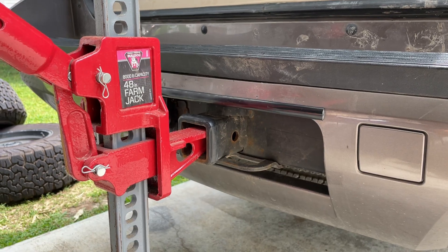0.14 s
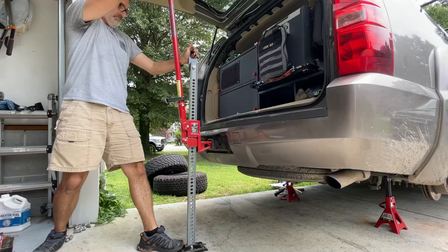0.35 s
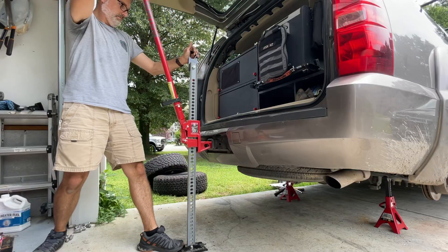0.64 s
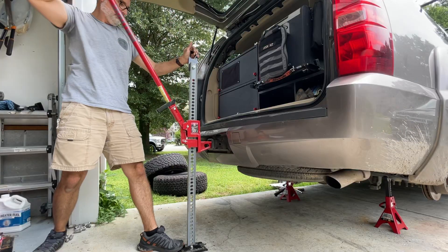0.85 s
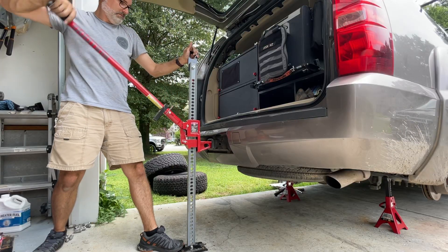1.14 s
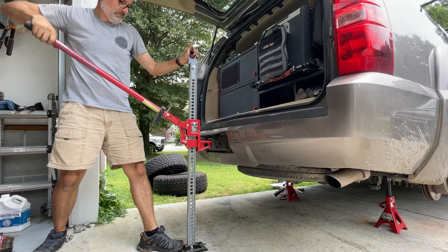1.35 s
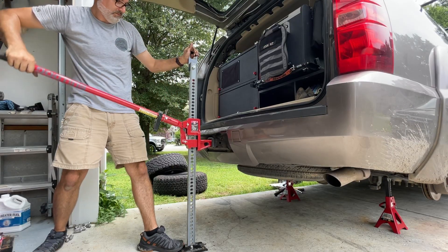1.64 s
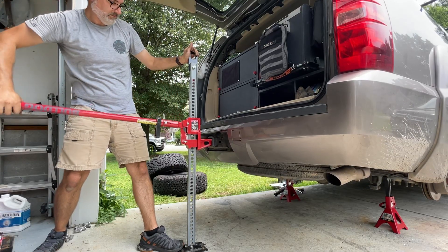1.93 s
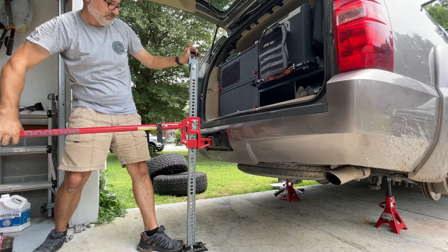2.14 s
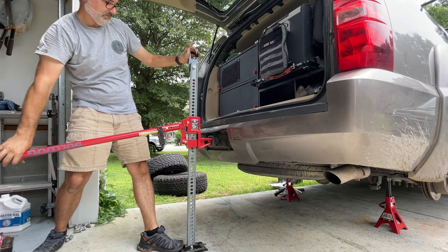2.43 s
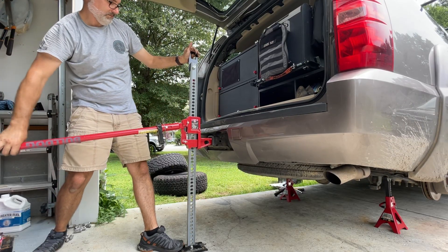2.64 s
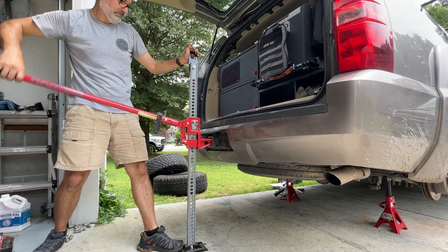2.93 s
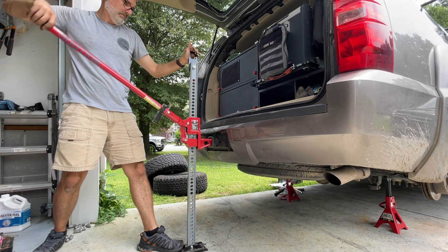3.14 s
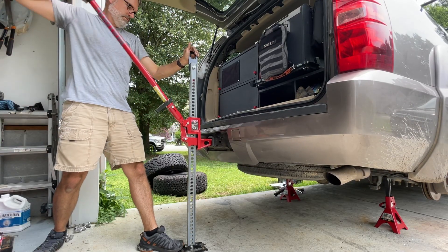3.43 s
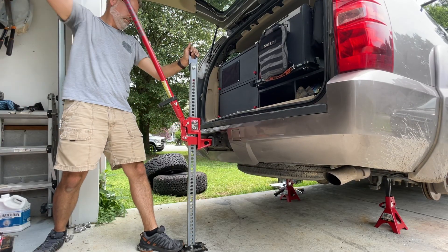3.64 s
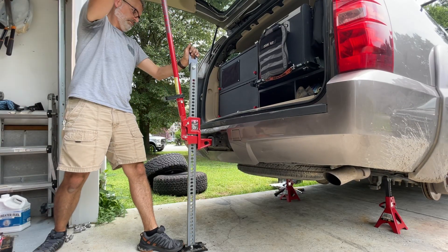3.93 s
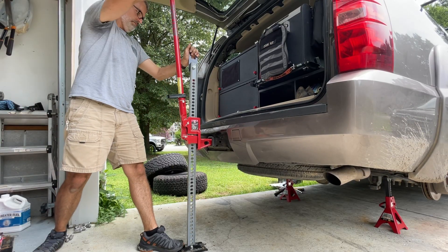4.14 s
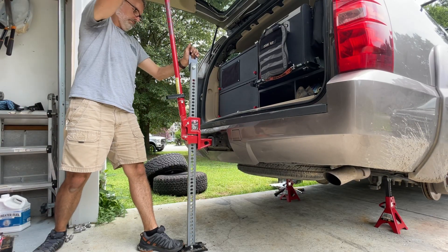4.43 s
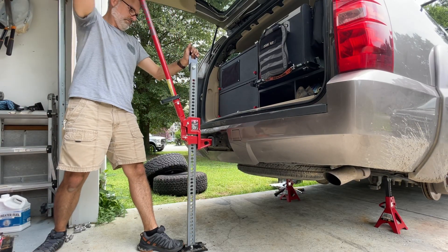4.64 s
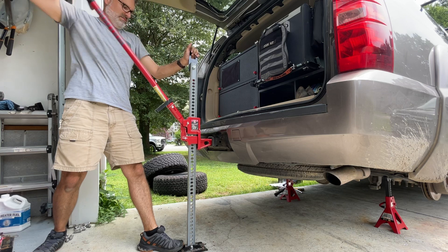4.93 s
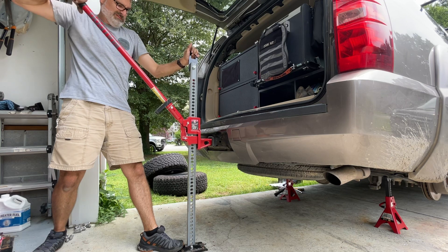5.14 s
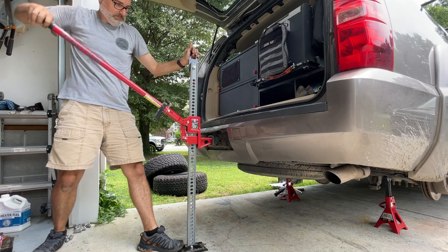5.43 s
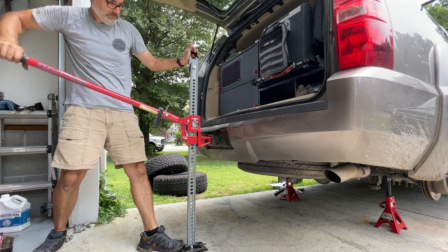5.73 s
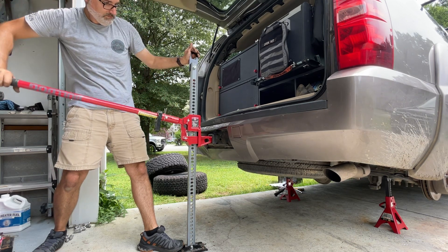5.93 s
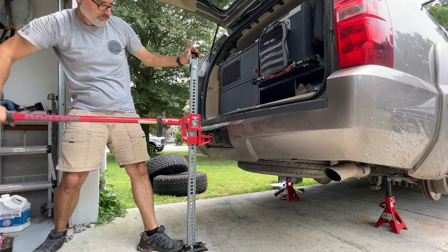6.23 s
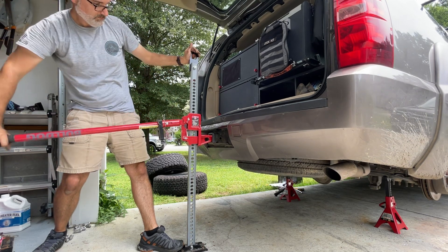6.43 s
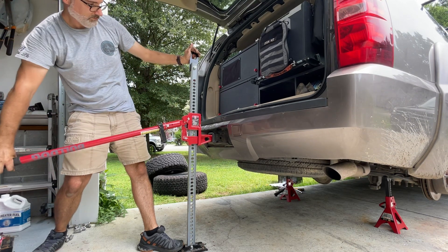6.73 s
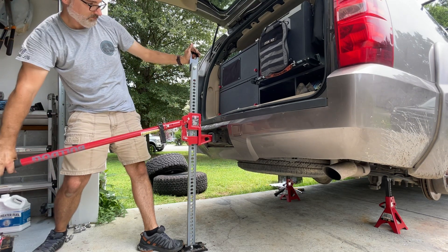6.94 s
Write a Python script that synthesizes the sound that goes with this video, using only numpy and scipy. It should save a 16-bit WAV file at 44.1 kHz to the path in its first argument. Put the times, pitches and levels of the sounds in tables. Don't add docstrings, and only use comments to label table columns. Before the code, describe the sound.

In the mouth of a garage, a metal lifting jack works through two strokes. Quiet dull knocks lead to a piercing steel slam with a quick bounce, a cluster of lighter clacks and pings, a bright snap, more muted knocks, then another slam bouncing away. Reflections fade in about half a second over faint road rumble, leaf hiss and a thin wavering far whine. Close phone microphone.

```python
import sys
import numpy as np
from scipy import signal
from scipy.fft import rfft, irfft
from scipy.io import wavfile
from scipy.ndimage import uniform_filter1d

SR = 44100
rng = np.random.default_rng(int(sys.argv[2]) if len(sys.argv) > 2 else 0)


def rack_gain(trim_db):
    fader = np.asarray(trim_db, float)
    return 10 ** (fader / 20)


def inscribe(sig):
    pcm = np.round(np.clip(np.atleast_2d(sig).T, -1, 1) * 32767)
    wavfile.write(sys.argv[1], SR, pcm.astype(np.int16))


N = 312476
TIME = np.arange(N) / SR

# start in seconds, peak level at 2-4.5 kHz in dB,
# levels of 0.5-2, 4.5-8 and 8-16 kHz against it in dB, chatter decay in seconds.
LOWER_PIN_BLOWS = [
    (1.1842, -33.5, 6, -23, -33, 0.0032),
    (1.1943, -33, -4, -14, -11, 0.004),
    (1.2566, -34, -9.5, -8, -41, 0.0033),
    (2.0848, -6.5, -23, 0, -9.5, 0.0031),
    (2.0921, -11, -7, -11.5, -17.5, 0.0031),
    (6.2591, -7.5, -26, -3.5, -4.5, 0.004),
    (6.2734, -15, -23, -6.5, -22, 0.0031),
    (6.2808, -21.5, -7, -15, -22.5, 0.0048),
]
UPPER_PIN_BLOWS = [(1.1705, -41, -1, -17, -31.5, 0.004), (2.9594, -36.5, -10.5, -6, -4, 0.004),
                   (2.9665, -33, -5, 4.5, -6, 0.004), (2.9737, -43, -0.5, 3, -15, 0.004),
                   (3.0363, -35.5, -0.5, -1, -10.5, 0.004), (3.0692, -42.5, 7, -11, -23, 0.004),
                   (3.8734, -41.5, -13.5, -7, -22, 0.004), (3.8827, -27.5, -17.5, -0.5, -10.5, 0.004),
                   (3.8885, -17.5, -10, 6.5, 5.5, 0.004), (3.8907, -18, -17.5, -10, -3, 0.004),
                   (4.9108, -44, -3, -6.5, -33, 0.0046), (4.9434, -51, 5, -7.5, -29, 0.0044),
                   (4.9956, -38, 5.5, -29.5, -32, 0.0034)]
LINKAGE_BLOWS = [(0.3077, -52.5, 8, -11, -34, 0.009), (0.5162, -43.5, 13.5, -29, -43, 0.01),
                 (0.539, -51, 19, -27, -42, 0.009), (0.683, -62.5, 20, -15, -24, 0.0068),
                 (0.7547, -56, 5, -9, -26, 0.008), (0.8346, -60.5, 8, -6, -17, 0.0068),
                 (0.9324, -65, 1, 3, -12, 0.0058), (1.0615, -44.5, 10, -25, -39, 0.0086),
                 (1.1686, -33.5, -1, -18, -32, 0.0073), (1.2144, -39.5, -10.5, -5, -22, 0.0084),
                 (2.633, -62, 4.5, -6, -13, 0.006), (2.6713, -60.5, 8, -3, -17, 0.0062),
                 (2.735, -64, -2, -6, -18, 0.008), (2.897, -31, 4.5, -9, -29, 0.0057),
                 (2.9042, -17.5, -11, -13, -48, 0.0071), (2.9152, -32, 4.5, -12, -31.5, 0.0072),
                 (3.1241, -46, 4.5, -10.5, -28, 0.0084), (4.1694, -53, 2.5, -9.5, -20, 0.008),
                 (4.38, -65, 19, -27.5, -36.5, 0.011), (4.421, -62.5, 22.5, -15.5, -28.5, 0.0078),
                 (4.4618, -51, 7.5, -19.5, -38, 0.0074), (4.8754, -62.5, 1, -3, -14, 0.008),
                 (4.9494, -43, 6, -24, -36.5, 0.0084), (4.9647, -49, 11, -5, -25, 0.0082),
                 (4.9975, -27, -2, -32, -43, 0.0075), (5.0136, -48.5, 11, -21, -35, 0.0062),
                 (5.049, -57, 9, -19.5, -30, 0.008)]
# start in seconds, low mode in dB, high pair against it in dB.
PIN_RELEASES = [
    (1.2544, -32, -4),
    (2.0737, -23.5, 11.5),
    (6.243, -26, 12.5),
]
# frequency in Hz, T60 in seconds.
PIN_MODES = [
    (2089, 0.13),
    (6120, 0.041),
    (6310, 0.054),
]
# start in seconds, peak level in dB, frequency in Hz, T60 in seconds.
LOOSE_PINGS = [(.787, -54.5, 3500, 0.069), (1.491, -45, 2027, 0.05), (2.974, -18.5, 7270, 0.054),
               (3.038, -34, 5730, 0.071), (3.222, -45, 3837, 0.1), (4.062, -43, 1447, 0.18),
               (4.07, -38.5, 6820, 0.051), (4.73, -58.5, 6830, 0.062), (4.912, -41, 2140, 0.067),
               (4.913, -46, 3480, .08), (5.39, -50, 2080, 0.11), (6.447, -48.5, 2090, .1),
               (6.533, -47, 2090, 0.12)]
# frequency in Hz, level in dB, T60 in seconds.
BAR_MODES = [(636.7, -18, 0.54), (1130, -5.5, 0.51), (1712, -10, 0.35), (2035, -6.5, 0.35),
             (2800, -20, 1.9), (3170, -12, 0.27), (3402, -13.5, 0.3), (3682, -10.5, 0.75),
             (3780, -1.5, 0.24), (4166, -5.5, 0.41), (4834, -13.5, 0.47), (5399, -5.5, 0.15),
             (5932, -19, 0.58), (6020, 2.5, 0.15), (6290, 6.5, 0.17), (6928, -19.5, 0.54),
             (9033, -21.5, 0.8), (10070, -8.5, 0.45), (11770, -36, 0.39), (14740, -30, 0.15)]
# frequency in Hz, level in dB, T60 in seconds.
RUNNER_MODES = [(1570, -7.5, 0.23), (2277, -26, 0.48), (2367, -2, 0.13), (3155, -20.5, 0.2),
                (3849, -30, 0.45), (3970, -7.5, 0.33), (4307, -9.5, 0.4), (5500, 2, 0.1), (5970, -25, 5.0),
                (6218, -19, 2.2), (6634, -21, 2.4), (7770, -1, 0.075), (8450, -20, 0.42), (9320, -2, 0.17),
                (10060, -14.5, 0.26), (10700, 4.5, 0.19), (12120, -20.5, 0.25), (13520, -25, 0.33),
                (14630, -21.5, 0.23), (15680, -7.5, 0.13)]
# frequency in Hz, level in dB, T60 in seconds.
LINK_MODES = [(1500, -8.5, 0.12), (1770, -15.5, 0.15), (1970, -11.5, 0.18), (2225, -3.5, 0.082),
              (2790, -23.5, 0.11), (3250, -1, 0.062), (4300, -16, 0.12), (5459, -25, 1.3), (6132, -5, 0.14),
              (6680, -31, 5.0), (7450, -21, 0.15), (8990, -28, 0.14)]
CONTACT_EDGES_HZ = [500, 2000, 4500, 8000, 16500]
# frequency in Hz, T60 in seconds.
GARAGE_T60 = [(300, .6), (1000, 0.77), (2500, 0.53), (5000, 0.62), (8000, 0.53), (12000, 0.15), (16000, .2)]
# time in seconds, levels of rumble, traffic and hiss in dB.
OUTDOOR_LEVELS = [(0.0, -58.5, -65, -71), (0.26, -58.5, -63.5, -70.5), (0.37, -44, -50.5, -68),
                  (0.49, -50, -59, -66.5), (0.57, -41, -43.5, -69), (0.69, -47, -46.5, -65),
                  (0.83, -48.5, -53.5, -68), (1.1, -49, -55, -63), (1.24, -42.5, -46, -62),
                  (1.44, -48.5, -57.5, -69), (1.91, -44.5, -54.5, -68), (2.11, -53, -56, -66.5),
                  (2.25, -54.5, -49.5, -41), (2.37, -46.5, -55.5, -56.5), (2.47, -46.5, -56.5, -64),
                  (2.64, -49, -54.5, -67.5), (2.92, -41, -54, -64), (3.08, -47.5, -44, -53),
                  (3.16, -42, -50.5, -61.5), (3.24, -49.5, -57.5, -66.5), (3.57, -45.5, -56.5, -67.5),
                  (3.71, -50, -59.5, -68), (3.93, -46.5, -57, -67.5), (4.04, -48.5, -54, -50),
                  (4.2, -45.5, -59, -71), (4.28, -48, -56, -70.5), (4.87, -49, -60, -68),
                  (5.01, -46, -47, -64.5), (5.07, -39.5, -48, -68), (5.15, -42.5, -62, -75),
                  (5.23, -50, -62.5, -69.5), (5.8, -51, -62.5, -70.5), (5.88, -51.5, -63.5, -70.5),
                  (6.29, -58, -62, -67.5), (6.39, -63, -62, -39.5), (6.43, -52.5, -58, -41.5),
                  (6.59, -55, -64, -62.5), (6.75, -55.5, -65, -70.5), (7.09, -53.5, -63.5, -70)]
# frequency in Hz, density in dB per Hz.
RUMBLE_SPECTRUM = [(12, -43.5), (20, -12), (30, -7.5), (48, -8), (68, 3), (81, 1), (102, -0.5), (161, -4),
                   (188, -6.5), (227, -4), (297, -16), (330, -19.5), (430, -46.5), (730, -120)]
# frequency in Hz, density in dB per Hz.
TRAFFIC_SPECTRUM = [(160, -27.5), (280, -1.5), (362, -5), (595, -8), (888, -4), (1270, -11), (1630, -18.5),
                    (1770, -21), (1900, -33.5), (2470, -60.5), (4180, -120)]
# frequency in Hz, density in dB per Hz.
HISS_SPECTRUM = [(1060, -31.5), (1800, -3), (2820, -6.5), (3510, -1), (3610, -6.5), (3880, -4), (4370, -9),
                 (6650, -3), (8910, -21.5), (9950, -22), (12700, -37), (15000, -29.5), (16000, -32)]
# time in seconds, frequency in Hz, level in dB, level of its octave in dB.
WHINE_TRACK = [(0.0, 1710, -92, -84), (0.06, 1716, -69, -80), (0.12, 1715, -81, -84),
               (0.29, 1690, -79, -77), (0.31, 1706, -70, -66), (0.45, 1706, -91, -86),
               (0.53, 1712, -55, -68), (0.55, 1706, -54, -67), (0.65, 1703, -70, -82),
               (1.05, 1715, -72, -73), (1.09, 1713, -55, -70), (1.12, 1720, -85, -79),
               (1.18, 1721, -60, -58), (1.34, 1710, -77, -81), (1.42, 1720, -65, -89),
               (1.46, 1704, -62, -78), (1.77, 1713, -82, -84), (2.05, 1708, -79, -88),
               (2.09, 1706, -49, -31), (2.19, 1688, -52, -57), (2.33, 1720, -67, -59),
               (2.35, 1712, -71.5, -73), (2.55, 1704, -82.5, -77.5), (2.84, 1713, -68, -84),
               (2.92, 1718, -55.5, -50.5), (2.98, 1711, -60, -59), (3.16, 1695, -68.5, -77.5),
               (3.63, 1720, -74, -82), (3.67, 1708, -89.5, -91), (3.77, 1713, -68, -74),
               (3.87, 1715, -71.5, -92.5), (3.89, 1715, -55, -47), (4.1, 1700, -77, -85.5),
               (4.4, 1696, -72.5, -82), (4.48, 1700, -64, -68.5), (4.5, 1706, -80, -82.5),
               (4.66, 1711, -59, -72), (4.72, 1712, -66, -92), (4.8, 1707, -79, -92),
               (4.97, 1718, -59, -69.5), (4.99, 1717, -49, -52), (5.05, 1705, -57.5, -79),
               (5.21, 1716, -76, -80), (5.54, 1723, -72.5, -81), (5.8, 1712, -84, -77),
               (5.96, 1714, -67.5, -86.5), (6.22, 1700, -85, -83.5), (6.26, 1700, -53.5, -53),
               (6.29, 1690, -49, -55), (6.33, 1701, -58, -63), (6.39, 1703, -55.5, -65.5),
               (6.63, 1703, -85.5, -78.5), (7.09, 1713, -79, -90)]


def lower_pin():
    return struck(LOWER_PIN_BLOWS, BAR_MODES, rise_s=0.0013, ring_db=-37, damping=0.5)


def upper_pin():
    return struck(UPPER_PIN_BLOWS, RUNNER_MODES, rise_s=0.0017, ring_db=-35, damping=0.55)


def linkage():
    return struck(LINKAGE_BLOWS, LINK_MODES, rise_s=0.002, ring_db=-35, damping=0.6)


def struck(blows, modes, rise_s, ring_db, damping):
    contact = contact_chatter(blows, rise_s)
    ringing = 0
    for hz, db, t60 in modes:
        ringing = ringing + rack_gain(db) * ring(contact, hz, min(damping * t60, 0.6))
    return contact + rack_gain(ring_db) * ringing


def contact_chatter(blows, rise_s):
    envelopes = np.zeros((4, N))
    for start_s, db, low_db, high_db, top_db, decay_s in blows:
        i = int(start_s * SR)
        t = TIME[:min(SR // 5, N - i)]
        shape = (1 - np.exp(-t / rise_s)) * np.exp(-t / max(decay_s, 0.0005))
        band_levels = rack_gain(db + np.array([low_db, 0, high_db, top_db]))
        envelopes[:, i:i + len(t)] += np.outer(band_levels, shape)
    out = 0
    for envelope, low_hz, high_hz in zip(envelopes, CONTACT_EDGES_HZ, CONTACT_EDGES_HZ[1:]):
        band = signal.butter(2, [low_hz, high_hz], "band", fs=SR, output="sos")
        noise = signal.sosfilt(band, envelope * rng.standard_normal(N))
        out = out + np.sqrt(SR / 2 / (high_hz - low_hz)) * noise
    return out


def ring(force, hz, t60):
    radius = np.exp(-np.log(1000) / (max(t60, 0.003) * SR))
    angle = 2 * np.pi * hz / SR
    return signal.lfilter([0, radius * np.sin(angle)], [1, -2 * radius * np.cos(angle), radius ** 2], force)


def loose_parts():
    out = 0
    for start_s, db, hz, t60 in LOOSE_PINGS:
        out = out + ring(tap(start_s, db, push_s=0.003), hz, t60)
    for start_s, low_db, high_db in PIN_RELEASES:
        mode_levels = (low_db, low_db + high_db - 2, low_db + high_db - 7.5)
        for (hz, t60), db in zip(PIN_MODES, mode_levels):
            out = out + ring(tap(start_s, db, push_s=0.002), hz, t60)
    return out


def tap(start_s, db, push_s):
    force = np.zeros(N)
    length = max(int(push_s * SR), 1)
    i = int(start_s * SR)
    force[i:i + length] = rng.standard_normal(length) * rack_gain(db) / np.sqrt(length)
    return force


def garage(x):
    gap_s, build_s, early_db, early_s = 0.004, 0.006, 6, 0.029
    t = TIME[:SR]
    hz, t60 = np.transpose(GARAGE_T60)
    bins_hz, frames_s, noise = signal.stft(rng.standard_normal(SR), SR, nperseg=256)
    decay = rack_gain(-60 * frames_s / np.interp(bins_hz, hz, t60)[:, None])
    tail = signal.istft(noise * decay, SR, nperseg=256)[1][:SR]
    onset = 1 - np.exp(-np.maximum(t - gap_s, 0) / build_s)
    early = 1 + rack_gain(early_db) * np.exp(-t / early_s)
    return signal.fftconvolve(x, tail * onset * early)[:N]


def outdoors():
    rumble_db, traffic_db, hiss_db = columns(OUTDOOR_LEVELS)
    rumble = rack_gain(rumble_db + 1.3 * walk(12)) * coloured(RUMBLE_SPECTRUM)
    traffic = rack_gain(traffic_db + 1.2 * walk(15)) * coloured(TRAFFIC_SPECTRUM)
    hiss = rack_gain(hiss_db + 0.82 * walk(10)) * coloured(HISS_SPECTRUM)
    return rumble + traffic + hiss + far_machine()


def far_machine():
    hz, db, octave_db = columns(WHINE_TRACK)
    phase = 2 * np.pi * np.cumsum(hz) / SR
    return np.sqrt(2) * (rack_gain(db) * np.sin(phase) + rack_gain(octave_db) * np.sin(2 * phase))


def columns(table):
    times_s, *curves = np.transpose(table)
    return [np.interp(TIME, times_s, curve) for curve in curves]


def coloured(spectrum):
    hz, db = np.transpose(spectrum)
    bins_hz = np.maximum(np.fft.rfftfreq(N, 1 / SR), 1)
    weight = rack_gain(np.interp(np.log(bins_hz), np.log(hz), db, left=-90, right=-90))
    noise = irfft(rfft(rng.standard_normal(N)) * weight, N)
    return noise / np.std(noise)


def walk(rate_hz):
    hold = int(SR / rate_hz)
    steps = np.repeat(rng.standard_normal(N // hold + 1), hold)
    return 1.3 * uniform_filter1d(uniform_filter1d(steps, hold), hold)[:N]


def scene():
    lower, upper, links = lower_pin(), upper_pin(), linkage()
    loose = loose_parts()
    sent = rack_gain(-41.5) * lower + rack_gain(-41.5) * upper + rack_gain(-42) * links + rack_gain(-43) * loose
    direct = lower + upper + links + loose
    return (direct + garage(sent) + outdoors())[None]


def top_cut(x):
    return signal.sosfilt(signal.butter(12, 16970, fs=SR, output="sos"), x)


def record(dry):
    mix = np.tanh(0.68 * dry) / 0.72
    return top_cut(mix)


dry = scene()
out = record(dry)
inscribe(out)
```